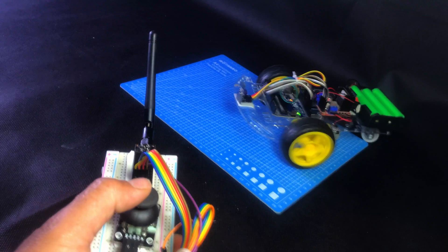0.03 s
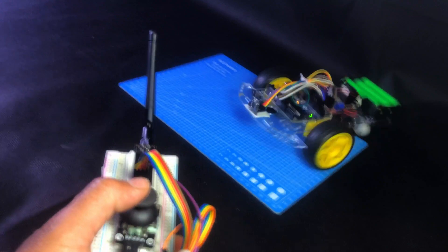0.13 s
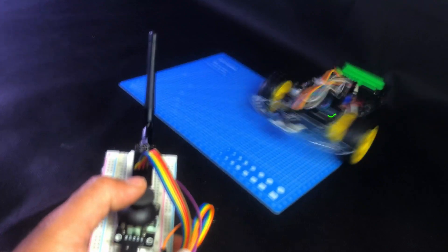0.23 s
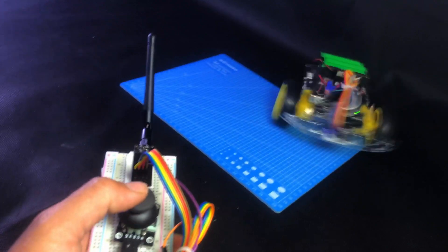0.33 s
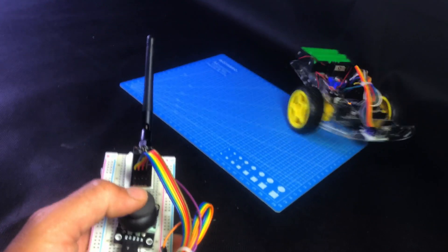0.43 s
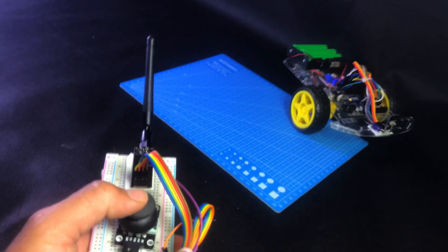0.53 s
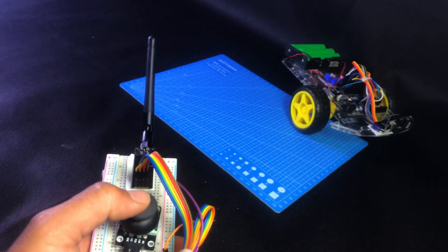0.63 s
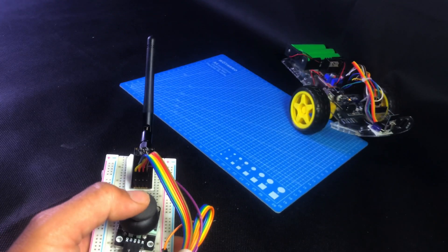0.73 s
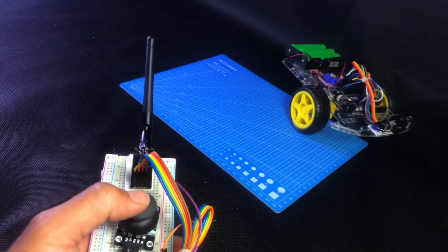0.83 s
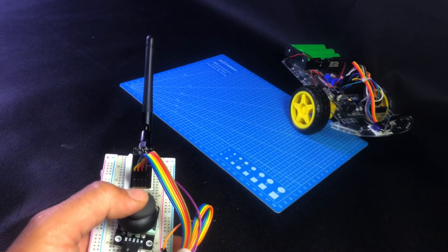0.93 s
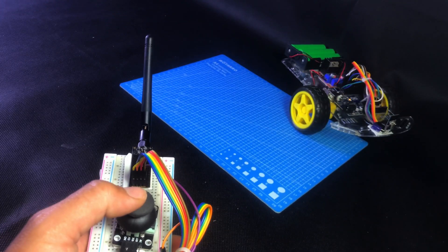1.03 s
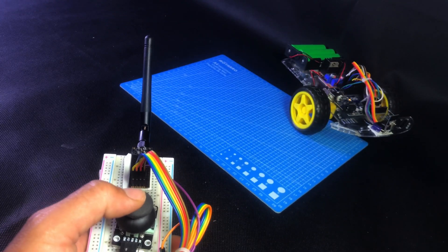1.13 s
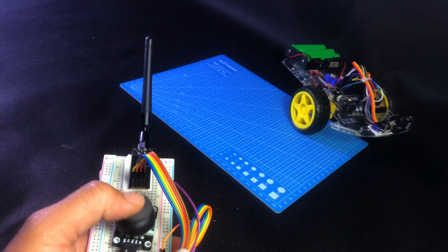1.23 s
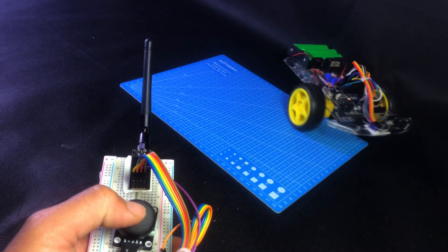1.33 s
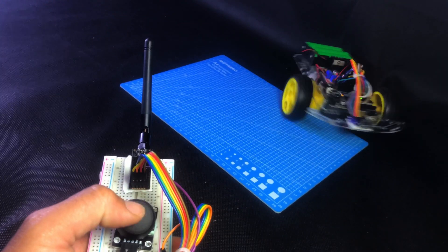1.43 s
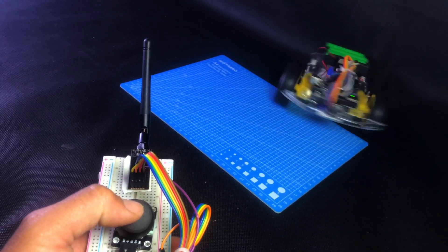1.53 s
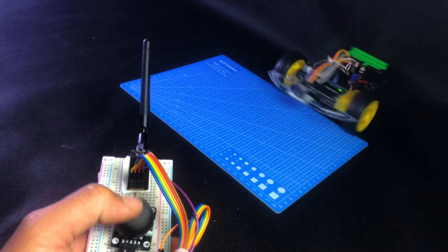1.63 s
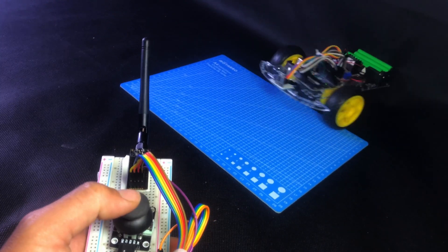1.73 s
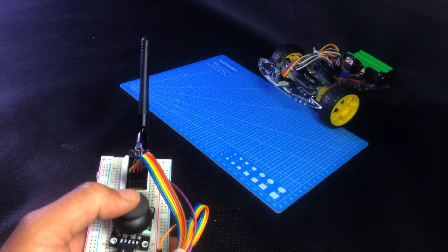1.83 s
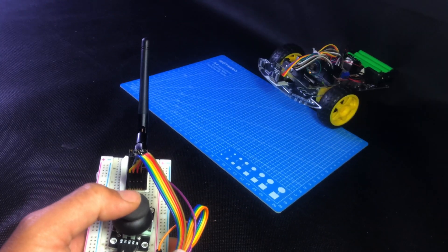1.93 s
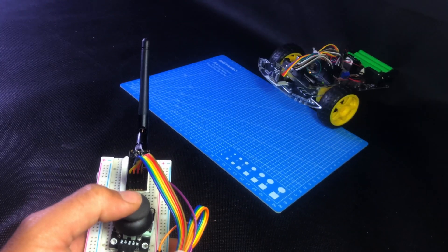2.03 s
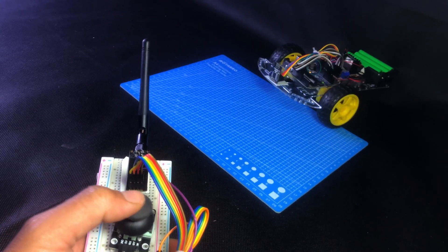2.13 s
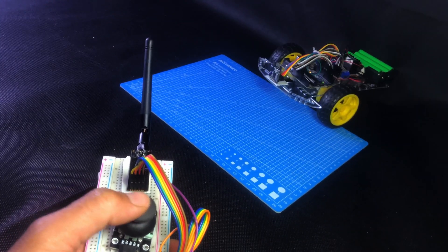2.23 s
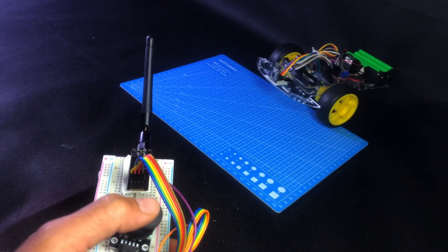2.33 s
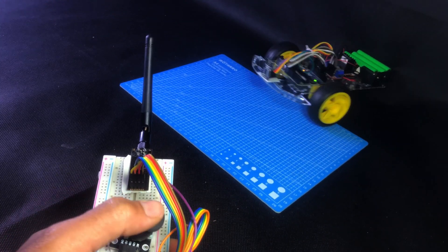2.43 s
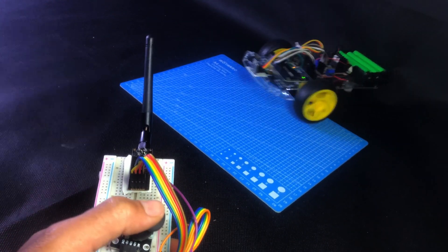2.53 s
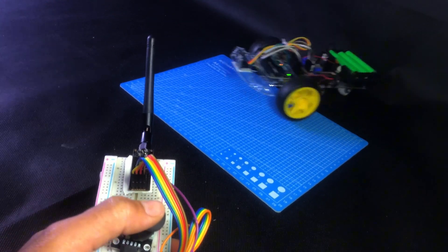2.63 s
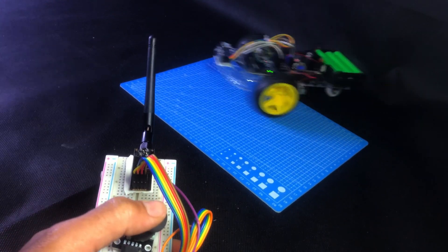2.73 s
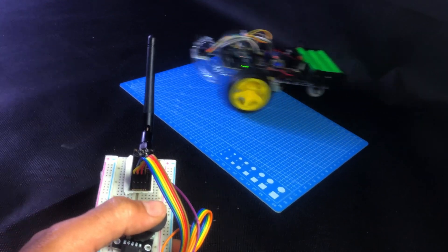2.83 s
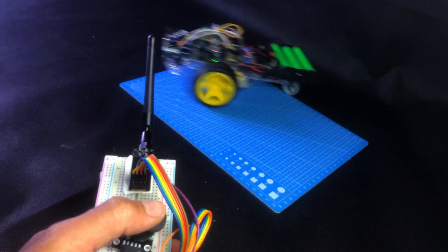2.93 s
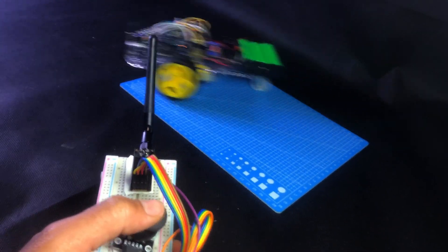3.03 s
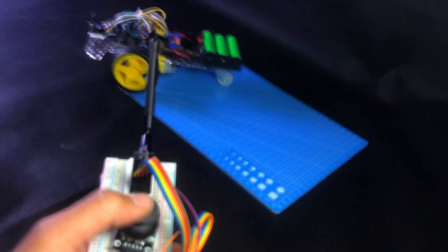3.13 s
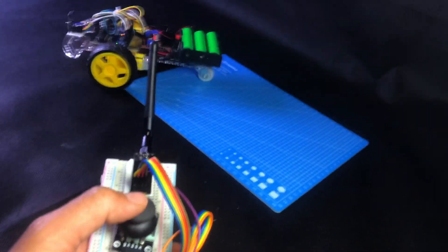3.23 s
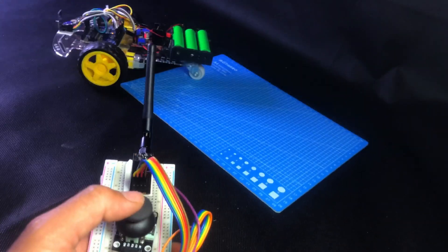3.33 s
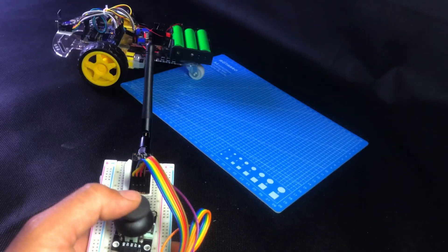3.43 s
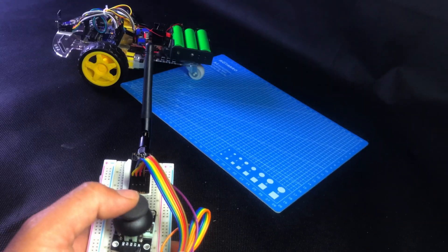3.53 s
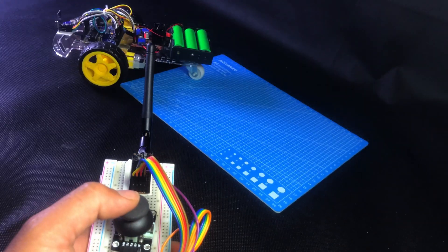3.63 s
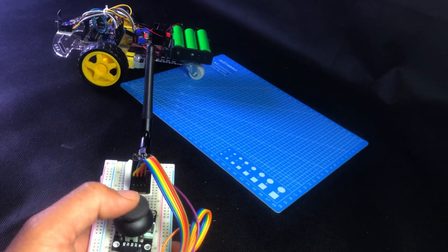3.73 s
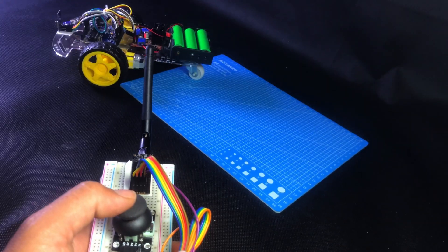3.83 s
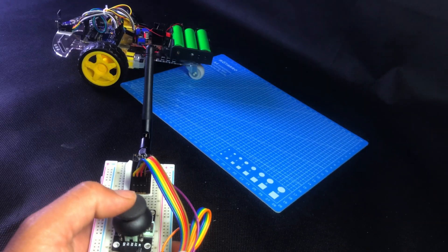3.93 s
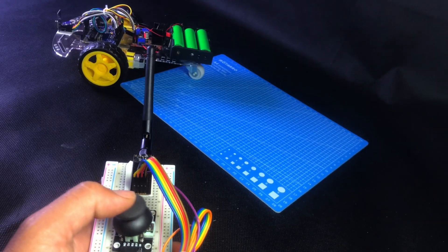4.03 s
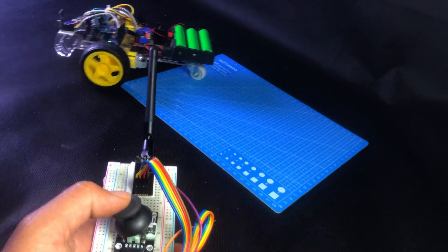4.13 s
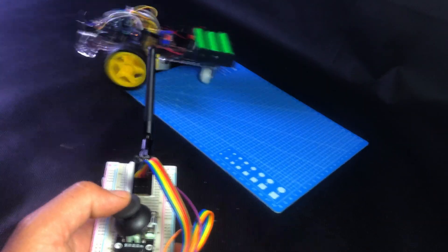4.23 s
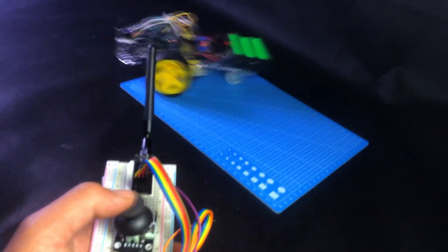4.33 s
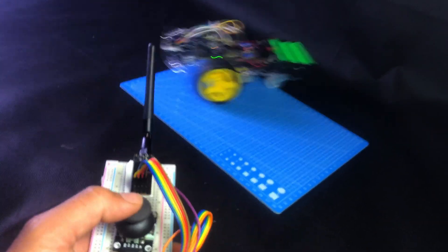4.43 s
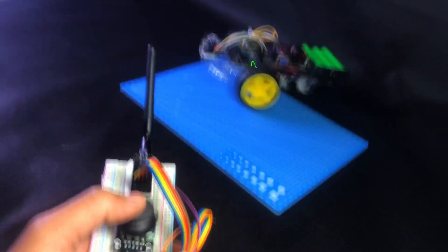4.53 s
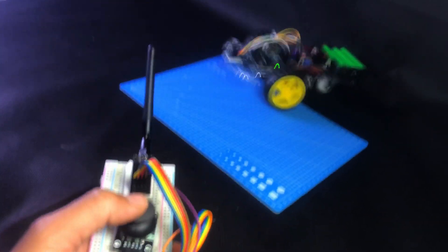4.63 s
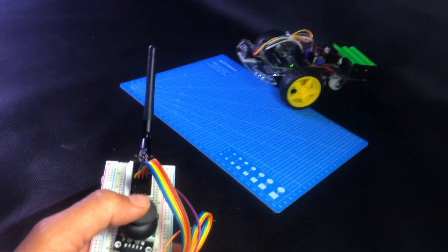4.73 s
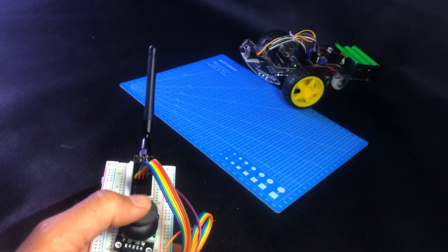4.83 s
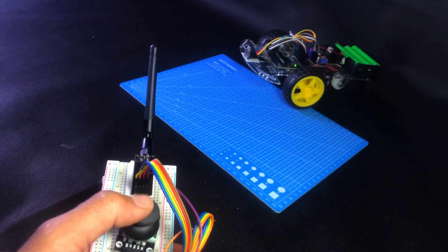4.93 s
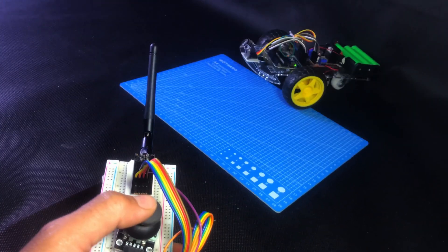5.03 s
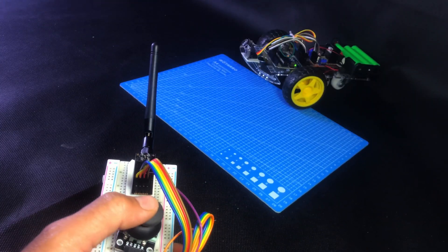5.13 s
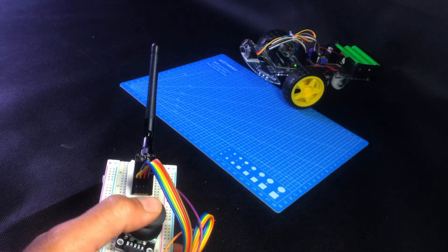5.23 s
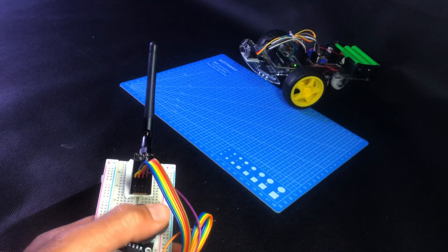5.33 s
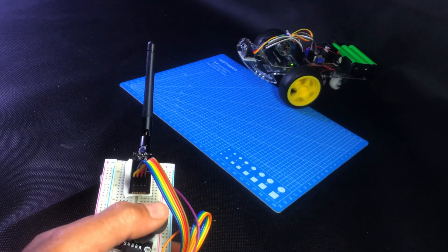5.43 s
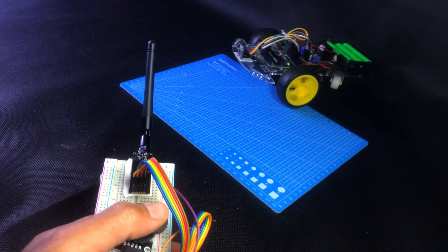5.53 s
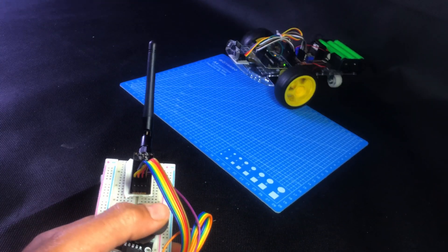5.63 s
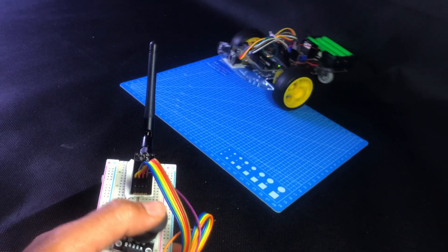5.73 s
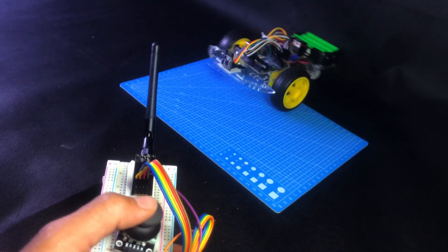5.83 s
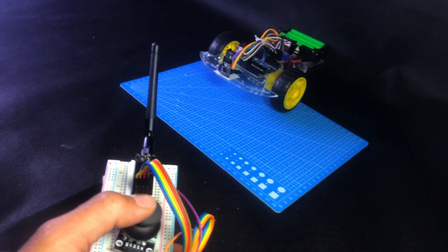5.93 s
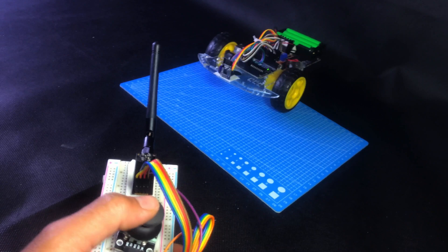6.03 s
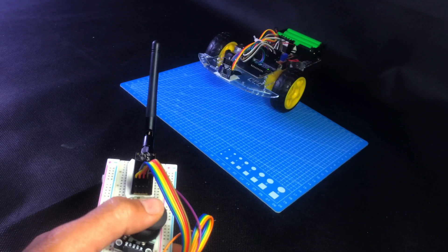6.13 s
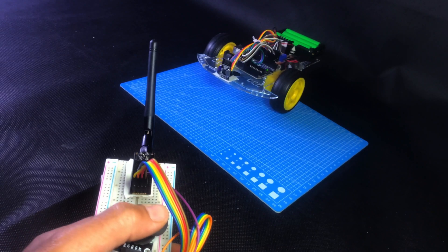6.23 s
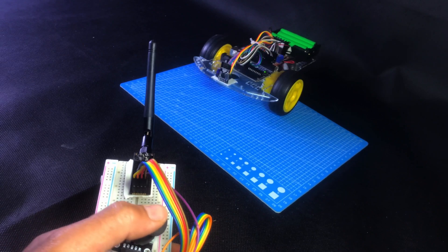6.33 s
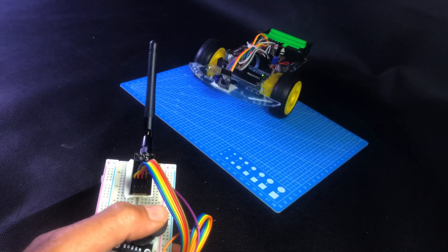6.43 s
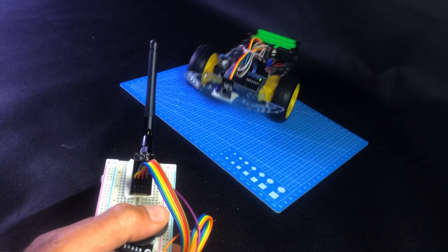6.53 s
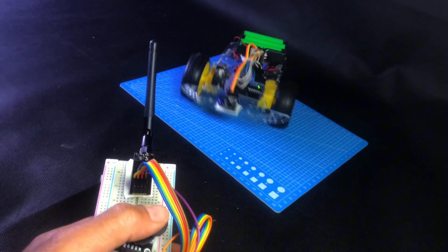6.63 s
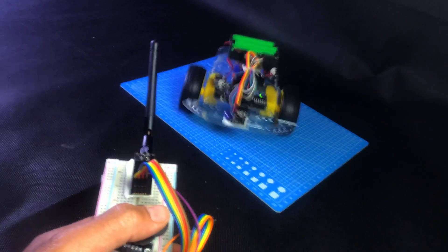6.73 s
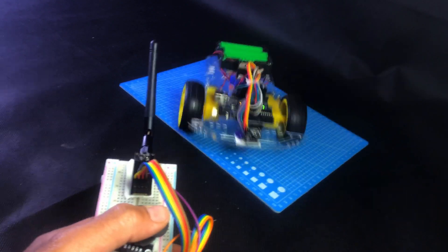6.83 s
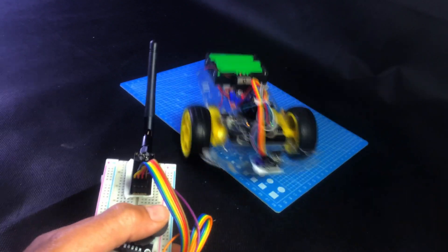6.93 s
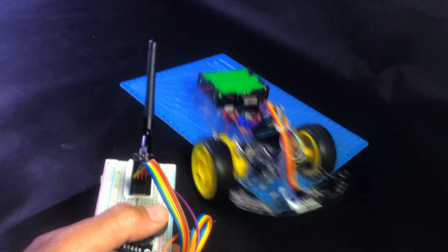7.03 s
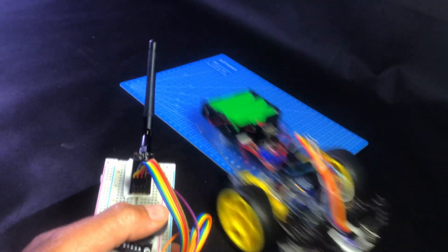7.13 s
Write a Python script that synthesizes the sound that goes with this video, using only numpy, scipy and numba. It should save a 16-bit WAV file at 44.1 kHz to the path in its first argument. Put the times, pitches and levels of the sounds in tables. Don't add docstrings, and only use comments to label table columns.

```python
import sys
import numpy as np
from scipy import signal
from scipy.fft import rfft, irfft
from scipy.io import wavfile
from scipy.ndimage import uniform_filter1d, map_coordinates
from numba import njit

SR = 44100
rng = np.random.default_rng(int(sys.argv[2]) if len(sys.argv) > 2 else 0)


def unload_wav(signal):
    wavfile.write(
        sys.argv[1],
        SR,
        np.round(np.clip(np.atleast_2d(signal).T, -1, 1) * 32767).astype(np.int16),
    )


def makeup_ratio(level_db):
    decades = np.asarray(level_db, float) / 20
    return 10 ** decades


N = 316638
T = np.arange(N) / SR


def level(x, db):
    return x * makeup_ratio(db) / np.sqrt(np.mean(x ** 2))


@njit
def svf(x, hz, width):
    y, b, l = np.empty(len(x)), 0., 0.
    g, k = np.tan(np.pi * hz / SR), width / hz
    for i in range(len(x)):
        v = (b + g * (x[i] - l)) / (1 + g * (g + k))
        b, l, y[i] = 2 * v - b, l + 2 * g * v, k * v
    return y


@njit
def teeth(hz, stretch, size):
    pulses, p, k = np.zeros(len(hz) + 1), 0., 0
    for i in range(len(hz)):
        step = hz[i] * stretch[k] / SR
        p += step
        if p >= 1:
            p, k = p - 1, k + 1
            pulses[i] += size[k] * p / step
            pulses[i + 1] += size[k] * (1 - p / step)
    return pulses[:-1]


def colour(x, points):
    hz, db = np.transpose(points)
    grid_hz = np.linspace(1, SR / 2, 4097)
    c = irfft(np.log(makeup_ratio(np.interp(np.log(grid_hz), np.log(hz), db))))
    c[1:4096] *= 2
    c[4097:] = 0
    return signal.fftconvolve(x, irfft(np.exp(rfft(c))))[:N]


def body(x, modes):
    return sum(makeup_ratio(db) * svf(svf(x, 1. * f, 1.21 * w), 1. * f, 1.21 * w) for f, w, db in modes)


def highpass(x, order, hz):
    return signal.sosfilt(signal.butter(order, hz, "high", fs=SR, output="sos"), x)


def walk(rate):
    k = int(SR / rate)
    held = np.repeat(rng.standard_normal(N // k + 1), k)
    return 1.195 * uniform_filter1d(uniform_filter1d(held, k), k)[:N]


def drum(rough_db):
    return rng.standard_normal(N) * makeup_ratio(rough_db * walk(40))


def decay(t, t60):
    return np.exp(-np.log(1000) * t / t60)


def ring(hz, t60, rise=0.00055):
    t = T[:int(.15 * SR)]
    return (1 - np.exp(-t / rise)) * decay(t, t60) * np.sin(2 * np.pi * hz * t)


def add(out, s, x):
    i = int(s * SR)
    out[i:i + len(x)] += x[:len(out) - i]


def moving(tables, smooth):
    return uniform_filter1d(sum((T >= r[0][0]) & (T <= r[-1][0]) for r in tables) * 1., size=smooth)


# freq_hz, density_db
ROOM = [(25, -20.5), (45, 1.5), (66, 5), (148, -9), (261, -1.5), (652, -13.5), (1000, -11), (1680, -17.5),
        (2020, -17.5), (3200, -20), (4080, -22), (5640, -25.5), (6110, -22.5), (11400, -23.5), (15700, -24)]
# freq_hz, width_hz, level_db
CRACKLE = [(3920, 1800, 1.5), (8300, 970, 5.5), (11000, 2300, 4.5), (14000, 2200, -18)]


def hiss():
    sparks_per_s = 320
    sparks = (rng.random(N) < sparks_per_s / SR) * makeup_ratio(3.5 * rng.standard_normal(N))
    crackle = body(signal.lfilter([1], [1, -.975], sparks) * rng.standard_normal(N), CRACKLE)
    return level(colour(rng.standard_normal(N), ROOM), -70) + level(crackle, -79.5)


WHINE_DB = [-95, -90.5, -90, -90.5, -95, -91, -105, -93, -104, -94, -99, -99, -99, -99, -101]


def digital_whine():
    whine_hz = 994.35
    out = 0
    for k, db in enumerate(WHINE_DB):
        out = out + makeup_ratio(db + 3.0) * np.sin(2 * np.pi * (k + 1) * whine_hz * T + k * k)
    return out


# on_s, off_s, gears_db, spin_up_s, coast_s
RUNS = [
    (0.028, 0.446, -53, 0.047, 0.17),
    (1.338, 1.773, -50.5, 0.069, .14),
    (2.371, 3.16, -51, 0.088, 0.37),
    (4.165, 4.47, -53, 0.065, 0.27),
    (4.542, 4.57, -49.5, 0.0041, .25),
    (5.385, 5.9, -50.5, 0.1, .14),
    (6.225, 7.3, -51, 0.1, .2),
]


def current_run(table):
    return np.transpose(table)[:, np.searchsorted([r[0] for r in RUNS[1:]], T)]


def effort():
    start, stop, _, spin_up, coast = current_run(RUNS)
    run_s, since = np.clip(T - start, 0, None), np.clip(T - stop, 0, None)
    rise_db = 1.4 * 20 * np.log10(np.clip(1 - np.exp(-run_s / spin_up), .01, 1))
    coast_db = 2.2 * 20 * np.log10(np.clip(1 - since / coast, .01, 1))
    cut_db, cut_s = 2.5, 0.017
    effort_db = rise_db + coast_db - cut_db * (1 - np.exp(-since / cut_s))
    return run_s, since, rise_db, coast_db, effort_db


# time_s, shaft_hz, in_step_db
SHAFT = [(0, 74.95, -4), (.14, 85.3, -1), (.22, 82.45, -12), (.33, 85.45, -21), (.45, 89.1, -5),
         (.68, 57, -1), (1.31, 56, -12), (1.5, 77.82, -12), (1.69, 72.28, -5), (1.9, 73.5, -2.5),
         (2.2, 57.54, 2), (2.34, 56.96, -15), (2.53, 66.35, -3), (2.65, 75.62, -1.5), (2.72, 75.74, -23),
         (2.8, 79.4, -1.5), (3.155, 79.87, -5), (3.6, 47, -1), (4.14, 56.28, -17), (4.36, 81.7, -16),
         (4.56, 68.36, -7.5), (5.05, 46, -9), (5.37, 58.57, -1.5), (5.6, 85.4, -4), (5.75, 84, -2),
         (5.9, 79.25, -9), (6.16, 52, 0.5), (6.21, 55.1, -10), (6.44, 71.13, -3.5), (6.7, 76.4, -2),
         (6.93, 75.47, 2), (7.0, 78, -11), (7.13, 78.36, 2.5), (7.18, 81.1, -1.5)]


def rotors():
    time_s, shaft_hz, step_db = np.transpose(SHAFT)
    return np.interp(T, time_s, shaft_hz), np.interp(T, time_s, step_db)


# time_s, shake_db
WHEELS = [
    [(0.0, -77), (0.068, -46), (0.138, -40.5), (0.322, -43), (0.338, -40.5), (0.464, -43.5), (0.516, -56),
     (0.64, -56), (0.68, -70)],
    [(1.31, -88), (1.398, -51), (1.492, -51), (1.638, -51.5), (1.69, -44.5), (1.776, -42), (2.066, -79),
     (2.124, -70), (2.2, -80)],
    [(2.34, -75), (2.426, -52.5), (2.56, -44), (2.936, -43), (3.026, -39), (3.058, -46.5), (3.21, -41),
     (3.416, -63.5), (3.6, -73)],
    [(4.14, -82), (4.19, -51), (4.33, -46.5), (4.364, -40), (4.514, -47), (4.548, -41.5), (4.732, -49),
     (5.044, -84), (5.05, -88)],
    [(5.37, -91), (5.418, -54), (5.586, -41.5), (5.634, -46), (5.772, -42.5), (6.014, -50), (6.046, -65),
     (6.07, -54.5), (6.16, -70)],
    [(6.21, -74), (6.3, -46), (6.906, -37), (6.942, -43), (6.97, -42.5), (7.008, -44), (7.046, -43),
     (7.138, -34.5), (7.18, -35.5)],
]


def wheel_shake_db():
    return np.interp(T, *np.concatenate(WHEELS).T)


# top_mesh_hz, chassis_over_gears_db, deck_db, second_order_over_table_db
STIRS = [(1402, 3, -60, -18), (1399.7, 2, -60.5, -7.5), (1378.7, 1.5, -62, -9), (1254.4, 1, -55.5, -9),
         (1150, 2, -52.5, -8), (1450, 1, -66.5, -14), (1419, 3.5, -63, -12)]


def unbalance():
    shaft, step_db = rotors()
    table_db, second_db = wheel_shake_db(), current_run(STIRS)[3]
    run_s, _, _, _, effort_db = effort()
    turn = 2 * np.pi * np.cumsum(shaft * (1 + 0.013 * walk(20))) / SR
    first = makeup_ratio(table_db + step_db + 0.78 * walk(18)) * np.sin(turn)
    orders = np.sin(2 * turn) + 0.3 * np.sin(3 * turn) + 0.29 * np.sin(4 * turn)
    board_hz, board_width_hz = 152.4, 15
    board = 1 / np.hypot(1, (2 * shaft - board_hz) / board_width_hz)
    settle_db = 10 * np.clip(run_s, 0, .65)
    upper_db = table_db + 0.25 * step_db + second_db + settle_db + 0.72 * effort_db + 2.0 * walk(14)
    return 1.37 * (first + board * makeup_ratio(upper_db) * orders)


# freq_hz, width_hz, level_db
TABLE = [(52, 10, -16), (75.4, 70, 17), (98, 19, 0), (163, 8.1, -14)]


def table_rumble():
    step_db = rotors()[1]
    random_share = np.sqrt(np.clip(1 - makeup_ratio(2 * step_db), .05, 1))
    return makeup_ratio(wheel_shake_db()) * random_share * level(body(drum(2.), TABLE), -.1)


# freq_hz, width_hz, level_db
CHASSIS = [(269.4, 36.5, -6.5), (325.2, 26.7, -1), (367, 27.9, 1)]


def chassis():
    run_s, _, rise_db, coast_db, _ = effort()
    top_db, over_db = current_run(RUNS)[2], current_run(STIRS)[1]
    kicks = teeth(rotors()[0], 1 + .015 * rng.standard_normal(size=999), makeup_ratio(2.5 * rng.standard_normal(size=999)))
    shake = level(body(drum(1.3) + level(kicks, -5.5), CHASSIS), -2.4)
    sag_db = 2 * run_s
    shake_db = top_db + over_db + 1.2 * rise_db + 0.87 * coast_db - sag_db
    return makeup_ratio(shake_db + 0.1 * (wheel_shake_db() + 51.0)) * shake


def deck():
    _, since, rise_db, _, _ = effort()
    fade_db_per_s = 70
    flutter = level(body(drum(2.5), [(440, 60, 0)]) * makeup_ratio(2.5 * walk(55)), -0.22)
    return makeup_ratio(current_run(STIRS)[2] + rise_db - fade_db_per_s * since) * flutter


def flaws(shaft_hz):
    wear_per_s = 9
    turns = np.cumsum(shaft_hz) / SR
    pattern = rng.standard_normal((100, 561))
    pattern[:, -1] = pattern[:, 0]
    return map_coordinates(pattern, [np.clip(wear_per_s * T, 0, 99), turns % 1 * 560], order=1)


# freq_hz, density_db
GEARBOX = [(260, -36), (450, 0), (538, -3), (579, -1.5), (662, -6.5), (757, -6), (1460, -5), (1850, -8),
           (2720, 0), (3880, -12.5), (5070, -15), (7040, -15.5), (7690, -21), (13100, -25.5), (15700, -30)]
# freq_hz, width_hz, level_db
CASING = [(999, 115, 1), (1150, 94, 2), (1300, 66, -2), (1450, 120, 2.5), (1583, 46, 1.5), (2320, 54, -10),
          (2670, 53, -13), (3020, 37, -6.5), (3440, 120, -10), (3840, 110, -1.5), (4390, 340, 0),
          (5580, 72, -11), (6900, 260, -16)]


def gears(shaft_hz, mesh_hz, rasp_db, brush_db, whirr_db, growl_db):
    out = 0
    for detune in (.99, 1.015):
        chance = rng.standard_normal((N // 16, 2)).T
        clicks = teeth(detune * mesh_hz, np.clip(1 + .12 * chance[0], .3, 2), makeup_ratio(7.3 * chance[1]))
        throb = 1 + 0.097 * np.cos(2 * np.pi * np.cumsum(detune * shaft_hz) / SR)
        sliding = level(rng.standard_normal(N), 0.75)
        repeating = level(flaws(detune * shaft_hz), 0.5)
        out = out + throb * (level(clicks - clicks.mean(), 0) + sliding + repeating)
    out = out * makeup_ratio(1.5 * walk(25))
    out = out + sum(makeup_ratio(db + 3.27 * walk(14)) * svf(out, 1. * f, 1. * w) for f, w, db in CASING)
    out = level(colour(out, GEARBOX), 0.043)
    brush = highpass(out, 2, 7000)
    whirr = body(out, [(3820, 800, 0)])
    growl = body(out, [(1340, 450, 0)])
    out = out + (makeup_ratio(whirr_db) - 1) * whirr + (makeup_ratio(growl_db) - 1) * growl
    rasp = svf(svf(out, 3600.0, 1700.0), 3600.0, 1700.0)
    return out + (makeup_ratio(rasp_db) - 1) * rasp + (makeup_ratio(brush_db) - 1) * brush


# rasp_3600hz_db, brush_over_7khz_db, late_whirr_3820hz_db,
# growl_1340hz_db
FACING = [(2, 6.5, 2.5, -3.5), (3, 5.5, 7, -3), (4, 4, 1.5, 0.3), (1.5, 4.5, 1.5, 0.5), (5, 3.5, 0.1, 0),
          (2.5, 3.5, 1, 0.3), (4.5, 4.5, 2, 1)]


def grind():
    start, _, top_db, _, coast = current_run(RUNS)
    run_s, since, _, coast_db, effort_db = effort()
    rasp_db, brush_db, whirr_db, growl_db = current_run(FACING)
    mesh = current_run(STIRS)[0] * (1 + 0.02 * np.clip(coast_db, -30, 0))
    mesh = mesh * (1 - (1 - .75) * np.exp(-np.abs(T - start) / .2))
    dull_db, dull_s = 12, 0.083
    treble_db = -dull_db * np.clip(np.exp(-run_s / dull_s) + since / (0.5 * coast), 0, 1)
    whirr_s = .2
    out = gears(rotors()[0], mesh, rasp_db + 0.44 * treble_db, brush_db - 0.84 * treble_db,
                whirr_db * np.clip(run_s / whirr_s, 0, 1) ** 2, growl_db)
    out = out + (makeup_ratio(treble_db) - 1) * highpass(out, 2, 2000)
    climb_db = 2 * run_s
    return makeup_ratio(top_db + effort_db + climb_db) * out


def car():
    return moving(WHEELS, 800) * (unbalance() + table_rumble() + chassis() + deck() + grind())


# on_s, off_s, tone_490hz_db, tone_975hz_db
DRIVE = [(0.031, 0.466, -65.5, -64), (1.341, 1.799, -61, -61), (2.383, 3.15, -59, -70),
         (4.174, 4.503, -66, -77), (5.392, 5.922, -65, -63.5), (6.227, 7.18, -67.5, -66)]


def drive():
    out = 0
    fast, slow = 2 * np.pi * 975 * T, 2 * np.pi * 490 * T
    high = np.sin(fast) + 0.39 * np.sin(2 * fast) + 0.24 * np.sin(3 * fast)
    for on, off, low_db, high_db in DRIVE:
        gate = np.clip((T - on) / 0.0054, 0, 1) * np.clip((off - T) / 0.02, 0, 1)
        gate = gate * (0.29 + np.exp(-np.abs(T - on) / 0.065))
        out = out + gate * (makeup_ratio(low_db) * np.sin(slow) + makeup_ratio(high_db) * high)
    return out * makeup_ratio(1.6 * walk(30))


# time_s, mesh_hz, tone_db
MESH = [
    [(0.05, 983, -62), (0.1, 1220, -67), (0.178, 1120, -63), (0.218, 1250, -68), (0.424, 1360, -67),
     (0.5, 1090, -63)],
    [(1.35, 983, -60), (1.444, 1310, -69), (1.486, 1060, -63), (1.648, 1360, -62), (1.772, 1190, -61),
     (1.85, 1280, -65)],
    [(2.38, 1100, -57), (2.422, 1130, -65), (2.462, 1520, -69), (2.514, 1160, -63), (2.84, 1370, -62),
     (3.3, 1270, -67)],
    [(4.18, 1240, -65), (4.272, 1430, -69), (4.35, 1090, -63), (4.45, 1130, -61), (4.48, 1260, -60),
     (4.53, 1200, -55)],
    [(5.4, 1140, -59), (5.466, 1570, -69), (5.53, 1230, -61), (5.636, 1450, -58), (5.892, 1330, -61),
     (5.95, 1410, -63)],
    [(6.24, 1010, -66), (6.288, 1360, -67), (6.37, 1250, -66), (6.7, 1440, -66), (7.126, 1330, -54),
     (7.18, 1440, -59)],
]
MESH_ORDERS_DB = [-1.7, -12, -12.5]


def mesh_whine():
    width_hz, fade_db_per_s = 70, 180
    s, hz, db = np.concatenate(MESH).T
    turn = 2 * np.pi * np.cumsum(np.interp(T, s, hz)) / SR
    tone = 0
    for k, order_db in enumerate(MESH_ORDERS_DB, 1):
        blur = walk(k * width_hz) * np.cos(k * turn) + walk(k * width_hz) * np.sin(k * turn)
        tone = tone + makeup_ratio(order_db) * blur
    since = np.clip(T - current_run(RUNS)[1], 0, None)
    return moving(MESH, 1500) * makeup_ratio(np.interp(T, s, db) - fade_db_per_s * since) * tone


# start_s, peak_db, centre_hz, width_share, t60_s
CLICKS = [(0.056, -45.5, 11800, 0.089, 0.013), (0.055, -49.5, 890, 0.2, 0.03),
          (0.104, -54, 3160, 0.96, 0.027), (.147, -50.5, 3860, 0.18, 0.046), (.147, -56.5, 8460, .6, 0.018),
          (.441, -66, 11300, .5, 0.017), (0.45, -53, 8950, 1.7, 0.0083), (.711, -62, 960, 0.47, 0.022),
          (2.326, -59, 1601, 1.43, 0.041), (2.326, -64, 13330, .3, .02), (2.399, -55.5, 4100, 1, .02),
          (2.399, -59, 10900, 1.7, 0.012), (.148, -45, 1150, 0.7, 0.036), (.527, -53, 750, .6, 0.018),
          (.592, -62, 746, 0.67, .02), (2.389, -51, 1100, 0.49, .03), (4.31, -58, 2010, 1, .02),
          (4.345, -60, 2000, 0.87, .02), (1.344, -60, 1000, .4, 0.033), (4.252, -49, 3030, 0.66, 0.052),
          (4.544, -38.5, 5500, 1.3, 0.014), (4.548, -45, 3070, 0.99, 0.089),
          (4.642, -45, 3440, 0.15, 0.025), (4.642, -48.5, 7200, 1.6, 0.015),
          (4.671, -54, 2120, 0.46, 0.065), (5.0364, -55.5, 2220, 0.69, 0.013),
          (5.394, -48, 1352, 0.27, 0.025), (5.394, -55, 2650, 0.22, 0.031), (5.415, -54, 2760, 0.24, .025),
          (6.2316, -55, 1488, 0.58, 0.025), (6.231, -50, 2650, 0.14, 0.017)]


def clicks():
    out, t = np.zeros(N), T[:int(.2 * SR)]
    for s, db, hz, share, t60 in CLICKS:
        width = 1.06 * np.clip(share, .05, 2) * hz
        burst = svf(svf(rng.standard_normal(len(t)), 1. * hz, width), 1. * hz, width)
        add(out, s, makeup_ratio(db) * level(burst, 2.5) * decay(t, max(t60, .003)))
    return out


# start_s, length_s, start_hz, end_hz, level_db
SQUEALS = [(.12, 0.059, 813, 890, -54.5), (.13, 0.054, 1070, 1150, -53), (1.516, 0.093, 1156, 1286, -57.5),
           (1.639, 0.076, 1450, 1426, -63), (2.373, .07, 978, 1300, -58.5),
           (2.443, 0.054, 1507, 1772, -54.5), (2.477, 0.052, 1960, 2120, -63),
           (1.365, 0.059, 1250, 1620, -63.5), (2.505, .07, 1118, 1160, -58.5),
           (2.59, 0.07, 1170, 1172, -56.5), (2.65, 0.053, 1405, 1521, -58), (3.608, 0.071, 438, 407, -75),
           (4.406, 0.03, 1150, 1130, -51), (5.443, 0.047, 1572, 1704, -54),
           (5.598, 0.17, 1456, 1446, -56.5), (6.277, 0.05, 1300, 1509, -56)]


def squeals():
    out, wobble, waver = np.zeros(N), makeup_ratio(3. * walk(60)), 1 + .04 * walk(250)
    for s, length, start_hz, end_hz, db in SQUEALS:
        u = np.arange(int(length * SR)) / (length * SR)
        hz = (start_hz + (end_hz - start_hz) * u) * waver[int(s * SR):][:len(u)]
        add(out, s, makeup_ratio(db + 1.0) * np.sqrt(np.sin(np.pi * u)) * np.sin(2 * np.pi * np.cumsum(hz) / SR))
    return out * wobble


# start_s, peak_db, pitch_hz
JOLTS = [(0.127, -44.5, 457), (0.134, -42, 320), (0.242, -37.5, 307), (0.279, -38.5, 382),
         (0.342, -39, 358), (0.4, -40, 375), (0.481, -48, 300), (1.393, -44.5, 374), (1.484, -46, 357),
         (1.54, -38, 367), (1.652, -37, 379), (2.474, -57, 350), (2.528, -44.5, 374.5), (2.675, -46, 382),
         (2.874, -39.5, 382), (3.001, -41, 362), (3.035, -45, 361.4), (3.136, -40, 345.7),
         (4.305, -43, 345), (4.339, -46, 351), (4.375, -37.5, 355), (4.407, -38, 347), (4.526, -42, 337),
         (5.485, -49, 337.8), (5.558, -47, 372), (5.593, -42, 332), (5.709, -46, 373.8),
         (5.781, -47, 344.3), (5.842, -43, 372), (5.89, -40, 363.4), (6.418, -35.5, 368.6),
         (6.484, -39, 359), (6.58, -39, 347.8), (6.697, -39.5, 380.3), (6.75, -36, 376.7),
         (6.835, -46, 328), (7.052, -45, 362), (7.141, -48, 346.8), (7.158, -40, 341.5)]


def jolts():
    out = np.zeros(N)
    for s, db, hz in JOLTS:
        add(out, s, makeup_ratio(db + 3) * ring(hz, 0.11, rise=0.0048))
    return out


# start_s, peak_db, pitch_hz, knock_rel_db
THUMPS = [(0.496, -41.5, 318, -16), (1.7, -35, 243, -16), (1.717, -32, 254, -16), (1.76, -39, 250.1, -13),
          (3.182, -32, 310.3, -13.5), (4.555, -28.5, 438, -38), (4.572, -29, 339, -18),
          (4.602, -33.5, 340, -29), (5.915, -37.5, 343, -30), (5.936, -48.5, 347, -30),
          (6.174, -46, 351.6, -11)]
# start_s, gap_s, peak_db, loss_per_bounce_db, knock_rel_db
BOUNCES = [
    (.526, .0324, -35.5, 1.7, -21.5),
    (4.636, .0345, -26, 2.94, -14),
]


def thumps():
    out, bounce_hz = np.zeros(N), 328
    bounces = [(s + k * gap, db - k * loss, bounce_hz, knock_db)
               for s, gap, db, loss, knock_db in BOUNCES for k in range(4)]
    for s, db, hz, knock_db in THUMPS + bounces:
        knock = makeup_ratio(knock_db + 7.5) * (ring(614, 0.024) + ring(946, 0.012))
        thump = ring(hz, 0.018, rise=0.0038) + 0.034 * ring(hz, 0.25)
        add(out, s + 0.00097, makeup_ratio(db + 12.5) * (thump + 0.26 * knock))
    return out


# start_s, peak_db, pitch_hz
TAPS = [(0.679, -69, 409), (1.82, -59, 427), (1.843, -59, 450), (1.875, -64, 393), (1.894, -65, 458),
        (1.936, -62, 458), (1.958, -67, 455), (1.991, -57.5, 447), (2.02, -58.5, 420), (2.046, -63, 424),
        (2.074, -72, 437), (2.104, -70, 423), (3.249, -48, 302), (3.293, -42.5, 361), (3.339, -51.5, 373),
        (3.387, -55, 409), (3.41, -68, 444), (3.436, -55.5, 412), (3.487, -57, 430), (3.515, -60, 410),
        (3.539, -69, 447), (3.617, -63, 412), (3.663, -61, 431), (3.695, -72, 433), (4.766, -44.5, 328),
        (4.789, -60, 385), (4.817, -56.5, 404), (4.847, -62, 363), (4.868, -61, 460), (4.9, -55.5, 423),
        (4.924, -62, 437), (4.951, -60, 414), (4.981, -59, 455), (5.068, -61.5, 439), (5.097, -70, 401),
        (5.984, -56, 379.8), (6.03, -53, 347), (6.068, -61, 390)]


def taps():
    out = np.zeros(N)
    for s, db, hz in TAPS:
        add(out, s, makeup_ratio(db + 7.5) * ring(hz, 0.046, rise=0.0043))
    return out


# start_s, peak_db
TICKS = [(0.9038, -67), (3.473, -61), (5.318, -60.5), (3.7424, -70), (3.9499, -64), (5.0875, -65),
         (6.068, -62), (6.0908, -62)]
# start_s, end_s, peak_db, ends_weaker_db (negative: ends louder)
SPELLS = [(3.5, 4.03, -59.5, -2), (4.75, 5.28, -59.5, -2), (5.998, 6.199, -59.5, -4)]


def radio_ticks():
    out = np.zeros(N)
    first_s, period_s, scatter_db = 3.473, .10248, .7
    ticks = list(TICKS)
    for s in np.arange(first_s, T[-1], period_s):
        chance_db = scatter_db * rng.standard_normal()
        for a, b, db, fade_db in SPELLS:
            if a < s < b:
                ticks.append((s, db - fade_db * (2 * (s - a) / (b - a) - 1) ** 2 + chance_db))
    for s, db in ticks:
        add(out, s, makeup_ratio(db + 2.5) * ring(1162, 0.021, rise=0.00031))
        add(out, s, makeup_ratio(db - 1) * rng.standard_normal(200) * np.exp(-T[:200] / 0.00079))
    return out


KNOCK_S = 4.544
# freq_hz, level_db, t60_s
KNOCK = [(1053, -0.5, 0.026), (2840, -5, 0.025), (5580, 0.5, 0.01), (6030, -12, 0.016), (9400, -3, 0.0068)]
# after_touch_s, level_db
KNOCK_HITS = [
    (0.0008, 2.5),
    (.0021, 0),
    (.0034, -21),
]


def knock():
    out = np.zeros(N)
    strike = sum(makeup_ratio(db) * ring(hz, t60, rise=0.0002) for hz, db, t60 in KNOCK)
    for late_s, hit_db in KNOCK_HITS:
        add(out, KNOCK_S + late_s, makeup_ratio(-32 + hit_db) * strike)
    return out


# freq_hz, width_hz, level_db
DEBRIS = [(696, 300, -1), (1229, 280, 8), (2860, 1000, -18), (5430, 1400, -17)]


def debris():
    grains_per_s, t60_s = 440, 0.65
    since = np.clip(T - KNOCK_S, 0, None)
    grains = (rng.random(N) < grains_per_s / SR) * makeup_ratio(5.2 * rng.standard_normal(N)) * rng.choice([-1, 1], N)
    out = level(body(grains, DEBRIS), -52.5) * (since > 0) * decay(since, t60_s)
    add(out, KNOCK_S, makeup_ratio(-27.5) * ring(46, 0.2, rise=0.0071))
    return out


def scene():
    near = car() + drive() + mesh_whine() + clicks() + squeals() + jolts() + thumps() + taps() + knock() + debris()
    t = T[:int(.5 * SR)]
    tail = rng.standard_normal(len(t)) * decay(t, 0.4) * (t > .004)
    wet = signal.fftconvolve(svf(near, 1550.0, 2600.0), tail / np.sqrt(np.sum(tail ** 2)))[:N]
    return (near + makeup_ratio(-8.0) * wet + hiss() + digital_whine() + radio_ticks())[None]


def top_cut(x):
    return signal.sosfilt(signal.butter(12, 16450, fs=SR, output="sos"), x)


def record(dry):
    x = dry[0] - .5 * svf(dry[0], 10420.0, 700.)
    x = highpass(x, 4, 36)
    x = signal.sosfilt(signal.ellip(10, .2, 45, 15720, fs=SR, output="sos"), x)
    return top_cut(x[None])


dry = scene()
out = record(dry)
unload_wav(out)
```